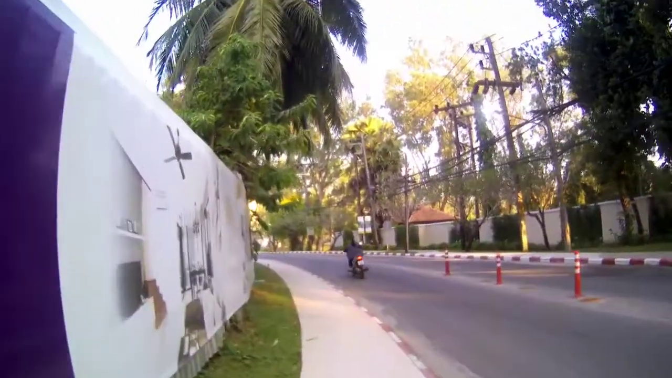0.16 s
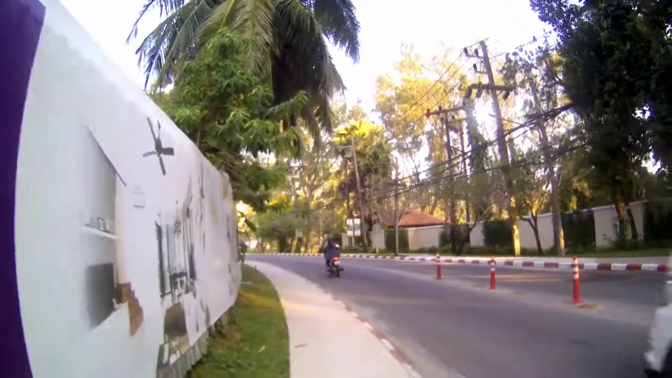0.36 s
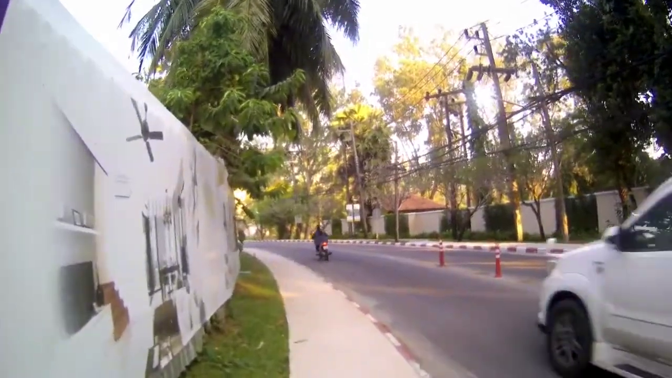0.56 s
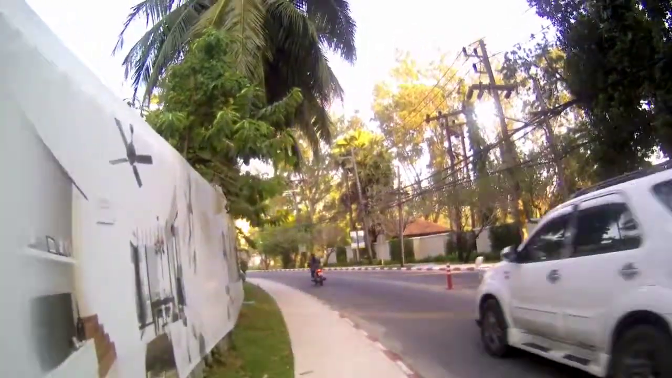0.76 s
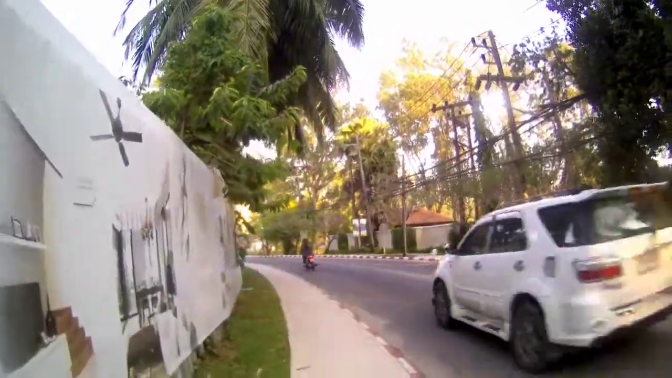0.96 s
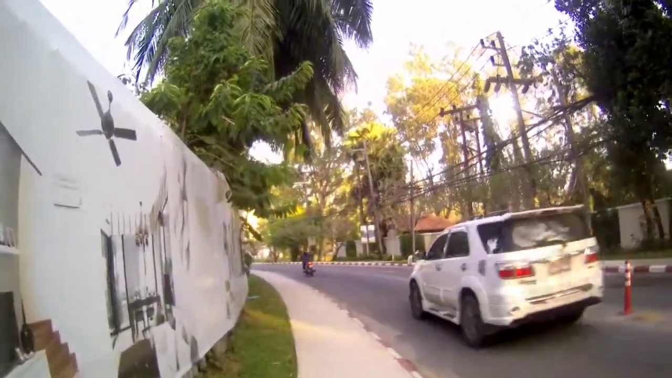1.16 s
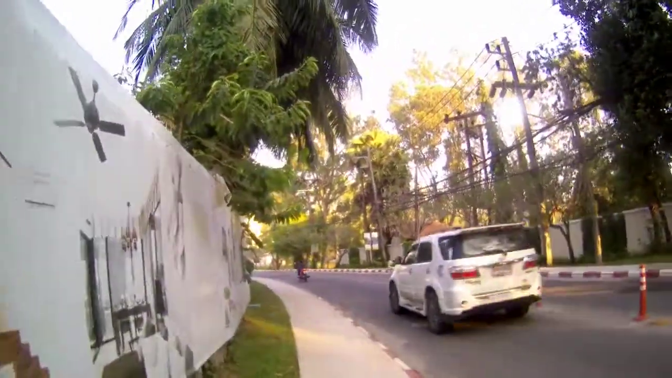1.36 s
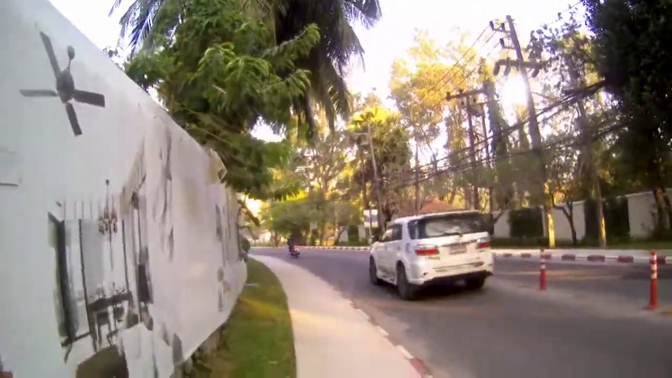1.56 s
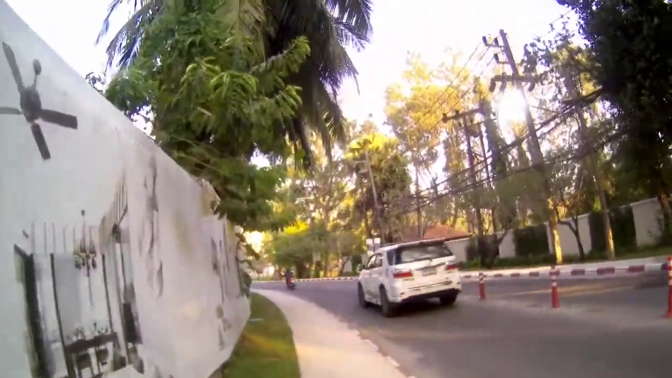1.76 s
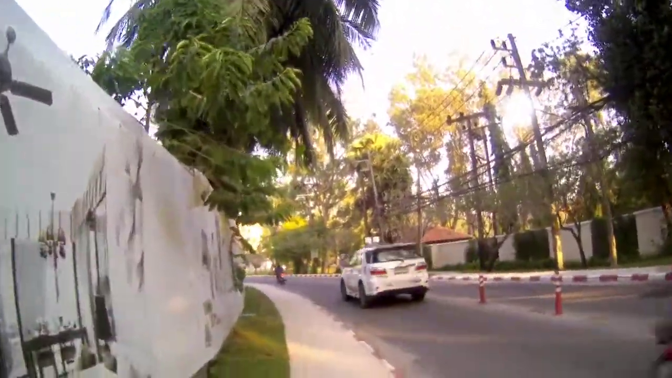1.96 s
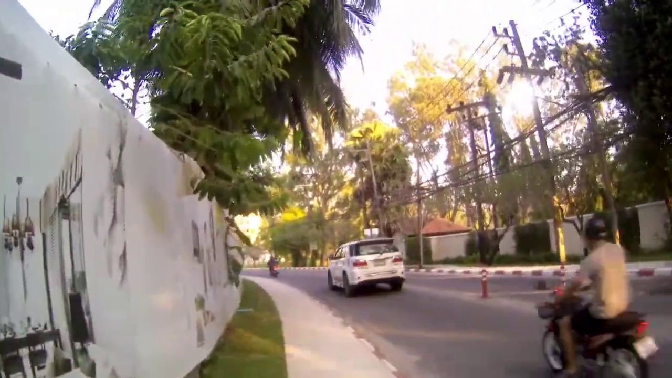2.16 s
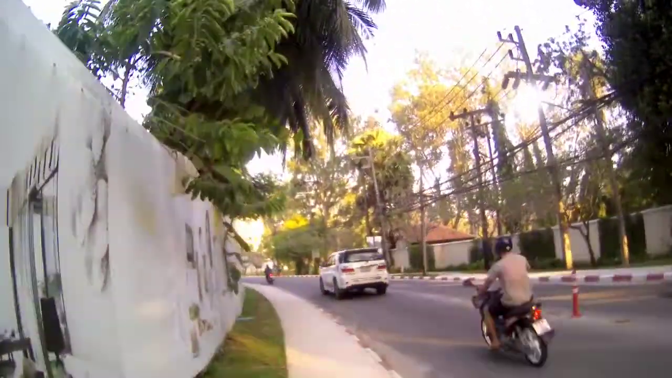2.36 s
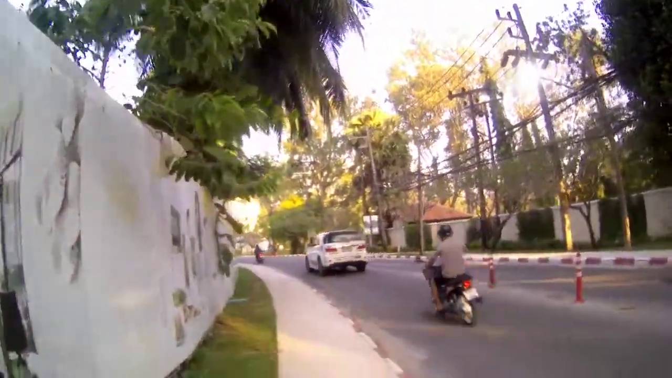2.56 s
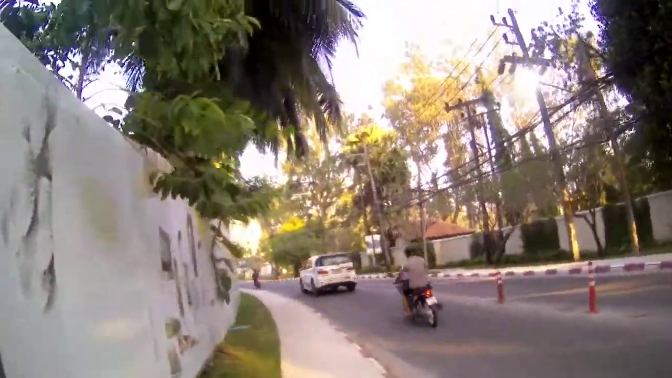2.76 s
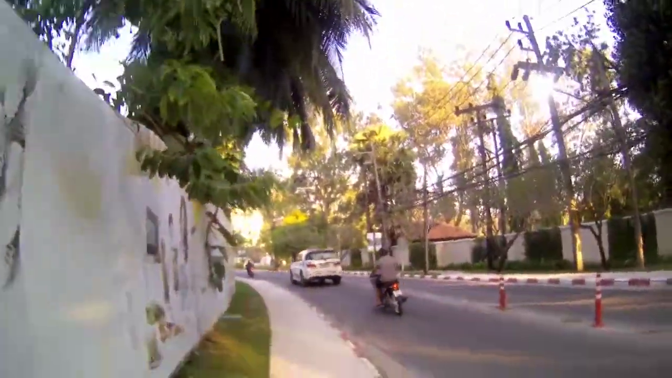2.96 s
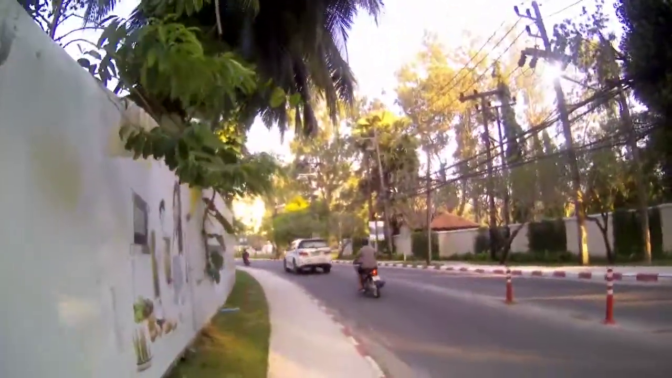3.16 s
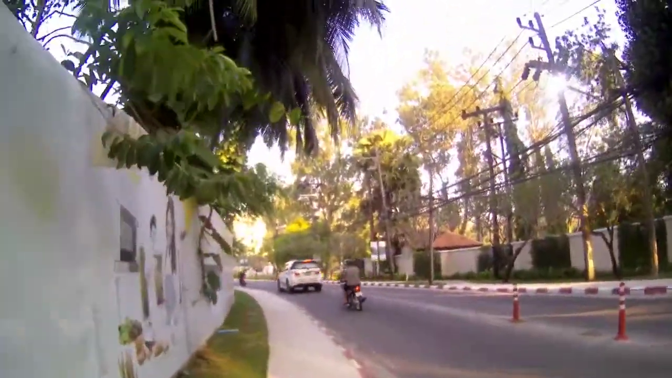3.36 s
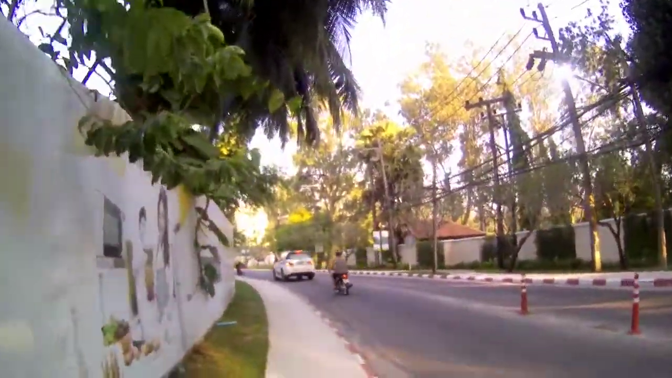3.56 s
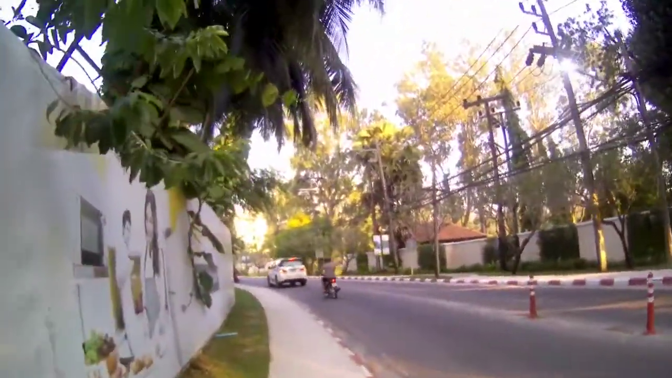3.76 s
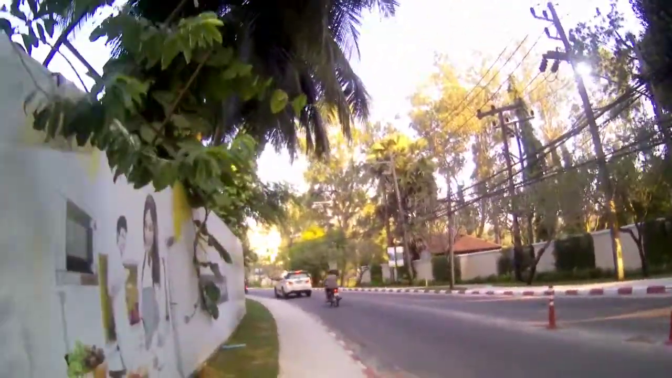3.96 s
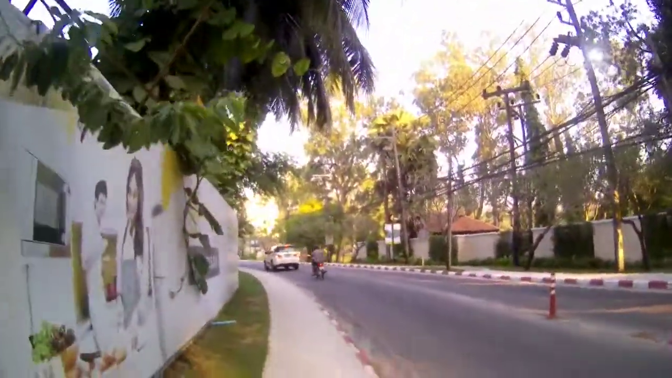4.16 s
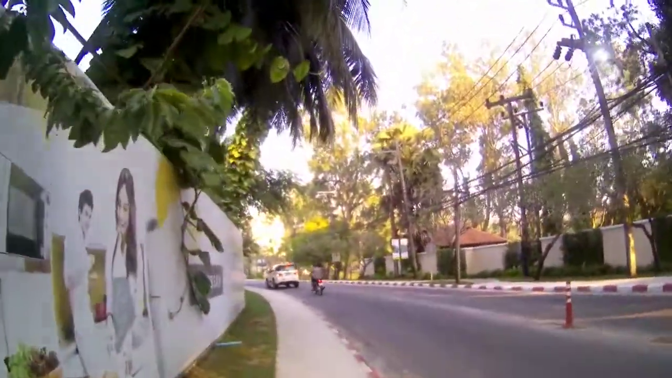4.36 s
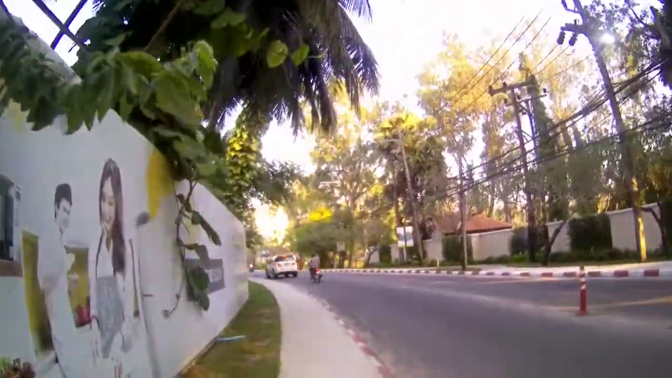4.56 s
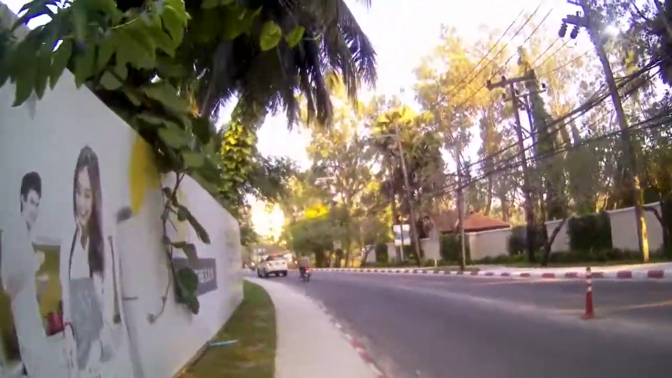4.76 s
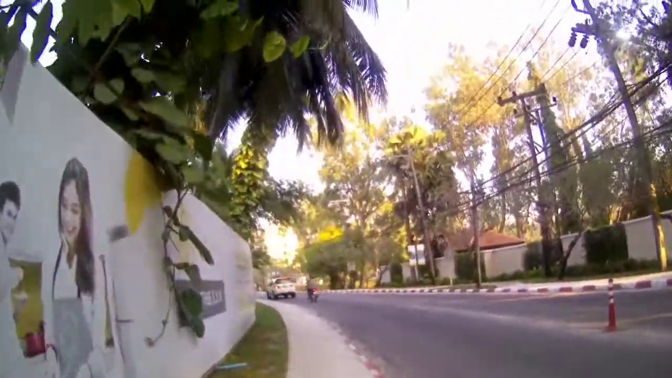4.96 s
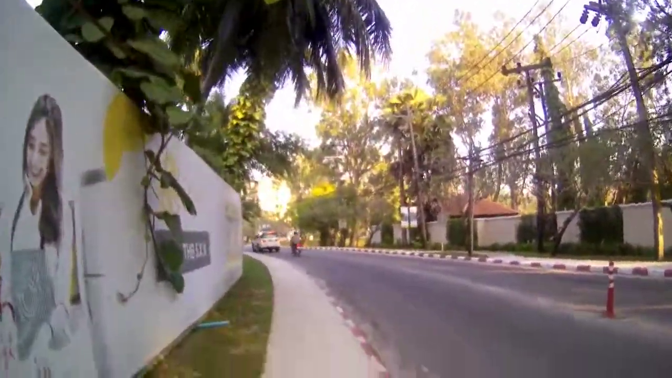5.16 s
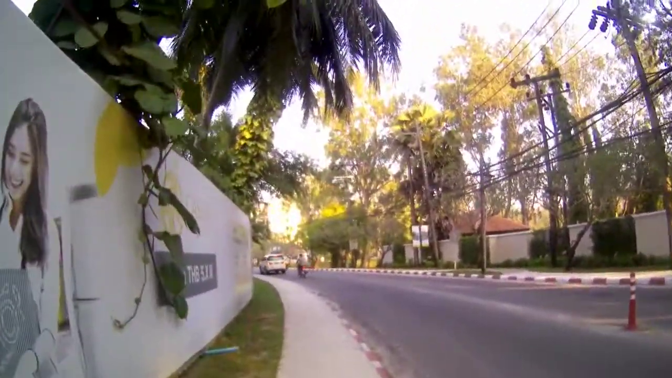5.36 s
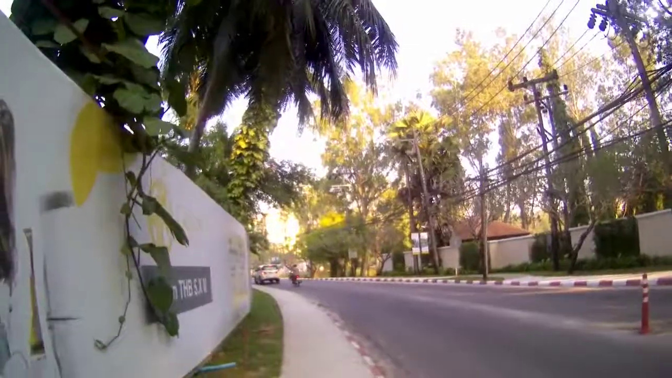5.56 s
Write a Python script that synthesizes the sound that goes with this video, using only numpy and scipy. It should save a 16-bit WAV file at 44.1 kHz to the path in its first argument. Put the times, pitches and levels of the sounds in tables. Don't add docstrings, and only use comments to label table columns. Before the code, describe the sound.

Muffled roadside traffic: a loud rushing car pass, a small single-cylinder motorbike puttering past, then both receding into soft road noise.

```python
import sys
import numpy as np
from scipy import signal
from scipy.fft import rfft, irfft, next_fast_len
from scipy.io import wavfile
from scipy.ndimage import uniform_filter1d, map_coordinates

SR = 44100
rng = np.random.default_rng(int(sys.argv[2]) if len(sys.argv) > 2 else 0)


def master_out(mix):
    frames = np.transpose(np.atleast_2d(mix))
    ceiling = np.clip(frames, -1, 1)
    pcm = np.round(ceiling * 32767).astype(np.int16)
    wavfile.write(sys.argv[1], SR, pcm)


def voltage_ratio(decibels):
    exponent = np.asarray(decibels, float) / 20
    return 10 ** exponent


N = 247401


def unit(x):
    return x / np.sqrt(np.mean(x ** 2) + 1e-20)


def curves(rows):
    s, *cols = np.transpose(rows)
    return [np.interp(np.arange(N) / SR, s, c) for c in cols]


def wobble(rate_hz):
    coarse = np.arange(0, N + 64, 64)
    knots = rng.standard_normal(int(N * rate_hz / SR) + 4)
    return np.interp(np.arange(N), coarse, map_coordinates(knots, [coarse * rate_hz / SR]))


def rush(spectrum, patchy_db):
    z = signal.stft(rng.standard_normal(N), nperseg=512)[2]
    field = uniform_filter1d(rng.standard_normal(z.shape), size=2, axis=0)
    field = uniform_filter1d(field, size=14, axis=1)
    noise = signal.istft(z * voltage_ratio(patchy_db * unit(field)), nperseg=512)[1][:N]
    m = next_fast_len(N + 8192)
    f, db = np.transpose(spectrum)
    gain = voltage_ratio(np.interp(np.log(np.fft.rfftfreq(m, 1 / SR) + 1), np.log(f + 1), db))
    return unit(irfft(rfft(noise, m) * gain, m)[:N])


def passing(layer, shade):
    # closest at t/s, kerb distance over speed/s, screened from t/s, screening/dB
    vehicle_passes = [
        (-.23, 1.6, .7, -0.1),
        (.36, 0.71, .7, -1),
        (1.74, 0.53, 2.24, -1.7),
    ]
    screening_s = 0.044
    *near_db, steep, far_db = layer
    t = np.arange(N) / SR
    power = voltage_ratio(2 * far_db)
    for db, (s, w, screen_s, screen_db) in zip(near_db, vehicle_passes):
        screened = .5 + .5 * np.tanh((t - screen_s) / screening_s)
        nearness = (1 + ((t - s) / w) ** 2) ** -steep
        power = power + voltage_ratio(2 * (db + shade * screen_db * screened)) * nearness
    return 10 * np.log10(power)


def tyres(crank_rad):
    # f/Hz, density/dB per Hz
    rumble_spectrum = [(5, -23), (20, -14), (35, -4), (90, -4.5), (170, -1), (250, -3.5), (330, -16.5),
                       (500, -64.5)]
    body_spectrum = [(150, -46), (250, -8), (330, 1), (500, 2), (650, -2), (800, -12), (1000, -57)]
    tread_spectrum = [(500, -55.5), (720, -11), (850, -2), (1000, 0), (1180, -1.5), (1350, -8),
                      (1700, -26.5), (2200, -58.5)]
    distant_spectrum = [(600, -50.5), (750, -7), (810, 0), (1050, -2), (1280, -2), (1380, -8.5),
                        (1700, -23), (2200, -60)]
    hiss_spectrum = [(1100, -38.5), (1500, 5.5), (1900, 4.5), (2300, -4.5), (3100, -12.5), (3600, -15.5),
                     (3800, -17.5), (4000, -27)]
    close_spectrum = [(420, -41.5), (540, -3), (640, -2.5), (760, -0.5), (900, -29.5), (1100, -58.5)]
    sizzle_spectrum = [(1700, -40), (2200, -2.5), (2700, 4), (3300, -5), (3750, -9), (4000, -21),
                       (4500, -61)]
    # closest point of each of 3 passes/dB, distance steepness, far traffic/dB
    rumble_pass = (-21, -17, -31.5, 1.5, -32.5)
    body_pass = (-15.5, -30, -23.5, 2, -39)
    tread_pass = (-41, -8.5, -14.5, 1.2223, -46.5)
    hiss_pass = (-27.5, -27.5, -23.5, 2.06, -43.5)
    sizzle_pass = (-35, -34, -42.5, 4, -61.5)
    # t/s, width/s, level/dB
    asphalt_patches = [
        (.52, .07, 0.6),
        (.92, .06, 0.7),
        (1.15, 0.13, 0.46),
        (1.42, .07, 0.1),
        (1.68, 0.028, -1.5),
        (1.87, 0.046, 1),
        (2.8, 0.073, 0.9),
        (3.22, 0.072, 1.3),
        (4.5, .08, -1.1),
    ]
    t = np.arange(N) / SR
    puff = np.cos(crank_rad - .8) * np.clip(t - 1.2, 0, 1)
    grit_db = .3 * wobble(9)
    for s, w, db in asphalt_patches:
        grit_db = grit_db + db * np.exp(-.5 * ((t - s) / w) ** 2)

    rumble = voltage_ratio(passing(rumble_pass, shade=.2) + 0.5) * rush(rumble_spectrum, patchy_db=1.1)
    body_db = passing(body_pass, shade=.4) + grit_db + 0.56 * puff
    body = voltage_ratio(body_db) * rush(body_spectrum, patchy_db=0.5)

    away_rad = np.pi / 2 * np.clip((t - 1.9) / .7, 0, 1)
    band = np.cos(away_rad) * voltage_ratio(0.82) * rush(tread_spectrum, patchy_db=1.37)
    band = band + np.sin(away_rad) * rush(distant_spectrum, patchy_db=0.86)
    tread = voltage_ratio(passing(tread_pass, shade=1.2) + grit_db + 0.56 * puff) * band

    hiss_db = passing(hiss_pass, shade=1.4) + grit_db + .7 * puff
    hiss = voltage_ratio(hiss_db) * rush(hiss_spectrum, patchy_db=1.24)
    close = voltage_ratio(-12 - 10 * t + grit_db) * rush(close_spectrum, patchy_db=3.0)
    sizzle_db = passing(sizzle_pass, shade=3.3) + grit_db
    sizzle = voltage_ratio(sizzle_db) * rush(sizzle_spectrum, patchy_db=2.4)
    return rumble + body + tread + hiss + close + sizzle


def car_engine():
    # t/s, firing f/Hz, level/dB
    car_firing = [
        (0, 46.77, -22),
        (.2, 46.38, -18.5),
        (.45, 46.06, -23),
        (.7, 46.37, -20.5),
        (1, 44.77, -30.5),
        (1.3, 43.16, -37.5),
        (1.6, 42.05, -27.5),
        (1.85, 40.1, -52),
        (2.4, 36.95, -40),
    ]
    hz, db = curves(car_firing)
    leave = np.clip((2.9 - np.arange(N) / SR) / 0.38, 0, 1)
    phase_rad = 2 * np.pi * np.cumsum(hz * (1 + .01 * wobble(8))) / SR
    fourth = voltage_ratio(-8.5 + 1.7 * wobble(6)) * np.sin(4 * phase_rad)
    return leave * voltage_ratio(db) * np.sqrt(2) * (np.sin(phase_rad) + fourth)


def motorcycle():
    # t/s, firing f/Hz
    bike_firing = [(.5, 29.03), (1.2, 29.35), (1.45, 30.08), (2.3, 29.4), (2.78, 29.4), (3.08, 27.63),
                   (3.27, 28.45), (3.5, 27.55), (3.85, 27.66), (4.1, 27.12), (4.4, 26.77), (4.62, 26.33),
                   (4.85, 26.11), (5.3, 25.07), (5.6, 25.83)]
    # order, t/s, width/s, level/dB
    echo_swells = [(1, 1.7, 0.62, -28), (2, 1.3, .4, -24), (2, 2.03, .6, -24), (3, 3.15, 0.27, -30),
                   (3, 4.7, 0.089, -34), (4, 1.97, .25, -19), (4, 3, 0.11, -31.5), (4, 3.68, .17, -30.5),
                   (4, 4.38, 0.14, -33.5), (4, 5.25, .17, -36), (5, .58, 0.13, -24.5), (5, 1.1, 0.088, -25),
                   (5, 1.946, 0.28, -11.5), (5, 2.85, .18, -25), (5, 3.45, 0.072, -30.5),
                   (5, 3.89, 0.14, -25.5), (5, 4.28, .15, -36), (5, 5.05, 0.34, -31.5), (6, .67, .1, -22),
                   (6, 1, 0.098, -24.5), (6, 1.68, 0.12, -21.5), (6, 2.13, .22, -19.5),
                   (7, 1.5, 0.22, -22.5), (7, 2.45, 0.14, -29.5), (8, 1.05, 0.13, -26.5),
                   (8, 1.42, 0.15, -23.5), (8, 5.05, 0.44, -45), (10, 1.8, 0.18, -28), (12, 1.3, 0.16, -31)]
    # order, level on turning/dB, loss/(dB/s)
    tailpipe_orders = [(2, -27.5, 4), (3, -31.5, 1.5), (4, -29, 1.5), (5, -35, 0.1), (6, -42, 1)]
    turn_s, turning_s = 2.63, 0.36
    swell_edge = 2.35
    slip_rad, misfire_db = .11, 0.64

    hz, = curves(bike_firing)
    t = np.arange(N) / SR
    crank_rad = 2 * np.pi * np.cumsum(hz * (1 + 0.0016 * wobble(12))) / SR + 1.516
    far = .6 + .2 * t

    def order(k):
        phase_rad = k * crank_rad - 2.4 - .02 * k * k + slip_rad * far * wobble(14)
        return np.sqrt(2) * np.cos(phase_rad) * voltage_ratio(1.3 * far * wobble(11))

    facing = .5 + .5 * np.tanh((t - turn_s) / turning_s)
    size = np.zeros((13, N))
    for k, db, loss_db in tailpipe_orders:
        size[round(k)] += facing * voltage_ratio(db - loss_db * (t - turn_s))
    for k, s, w, db in echo_swells:
        size[round(k)] += voltage_ratio(db) * np.exp(-.5 * np.abs((t - s) / w) ** swell_edge)
    pulses = sum(row * order(k) for k, row in enumerate(size) if row.any())
    return pulses * voltage_ratio(misfire_db * far * wobble(22) + .6 * far * wobble(4.6)), crank_rad


def narrow_channel(x):
    # from f/Hz, to f/Hz, share of blocks
    starved_bands = [(3130, 3210, .08), (3280, 3360, .06), (3700, 3850, .12), (3850, 4100, .5)]
    # f/Hz, gain/dB
    smoothing_filter = [(3500, 0), (3800, -1), (4000, -4), (4250, -12.5), (4450, -33), (4600, -52.5),
                        (4700, -110)]
    fold_hz = 4000
    hz, _, z = signal.stft(x, SR, nperseg=2048)
    luck = rng.random((len(starved_bands), z.shape[1]))
    luck = np.repeat(luck, 2, axis=1)[:, :z.shape[1]]
    for (lo, hi, share), u in zip(starved_bands, luck):
        z = z * (1 - np.outer((hz > lo) & (hz <= hi), u < share))
    starved = signal.istft(z, SR, nperseg=2048)[1][:N]

    m = next_fast_len(N + SR // 2)
    spectrum = rfft(np.pad(starved, (0, m - N), 'reflect'))
    fold = round(fold_hz * m / SR)
    image = np.conj(spectrum[fold:0:-1])
    mirrored = np.concatenate([spectrum[:fold], image, np.zeros(len(spectrum) - 2 * fold)])
    f, db = np.transpose(smoothing_filter)
    return irfft(mirrored * voltage_ratio(np.interp(np.fft.rfftfreq(m, 1 / SR), f, db)), m)[:N]


def ceiling(x, top, knee):
    return x / (1 + np.abs(x / top) ** knee) ** (1 / knee)


def scene():
    bike, crank_rad = motorcycle()
    return (tyres(crank_rad) + car_engine() + bike)[None]


def top_cut(x):
    return signal.sosfilt(signal.butter(12, 15870, fs=SR, output="sos"), x)


def record(dry):
    saturated = ceiling(dry[0], top=0.76, knee=8.4)
    narrow = narrow_channel(saturated)[None]
    return top_cut(ceiling(narrow, top=0.68, knee=64))


dry = scene()
out = record(dry)
master_out(out)
```